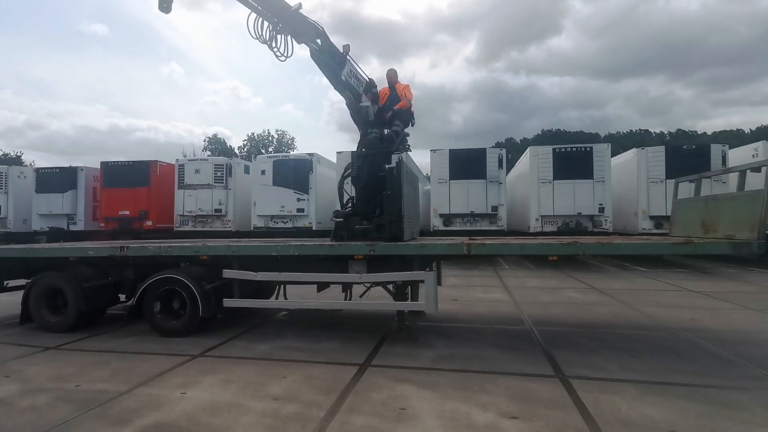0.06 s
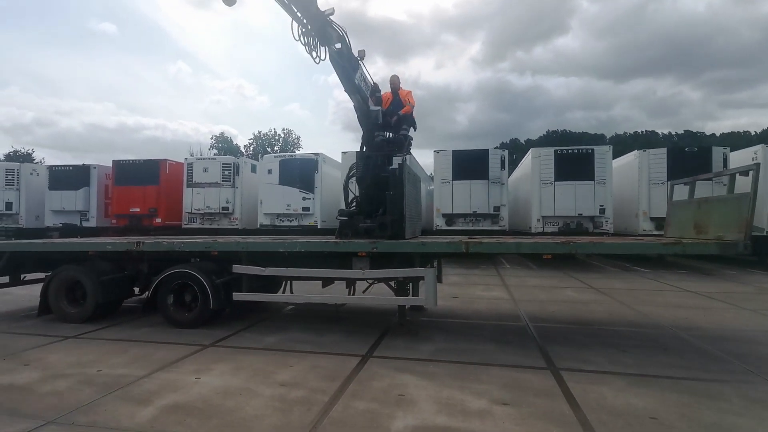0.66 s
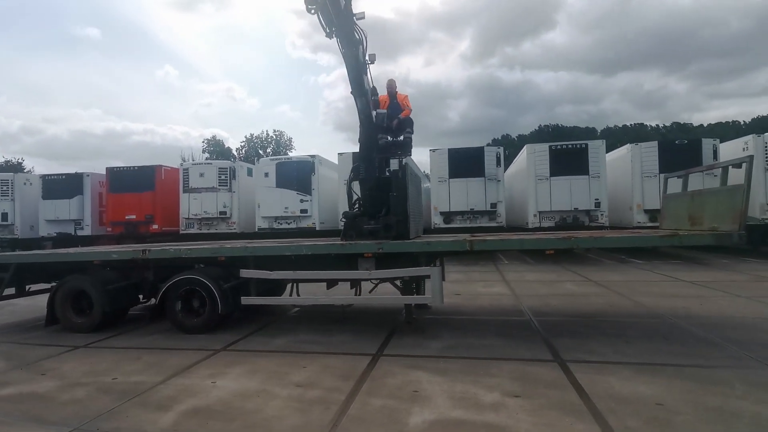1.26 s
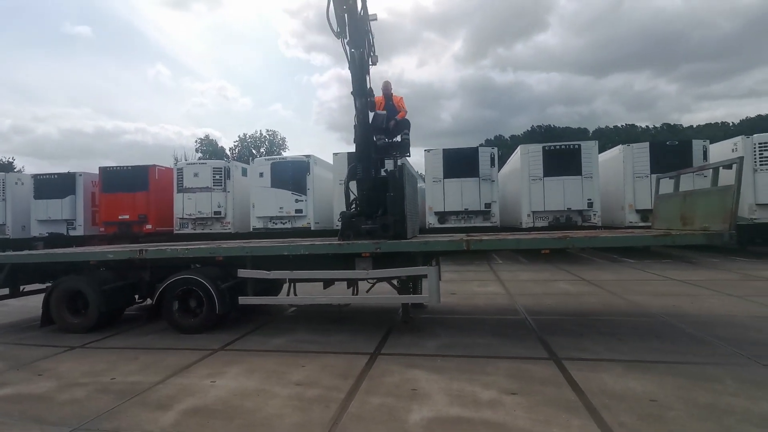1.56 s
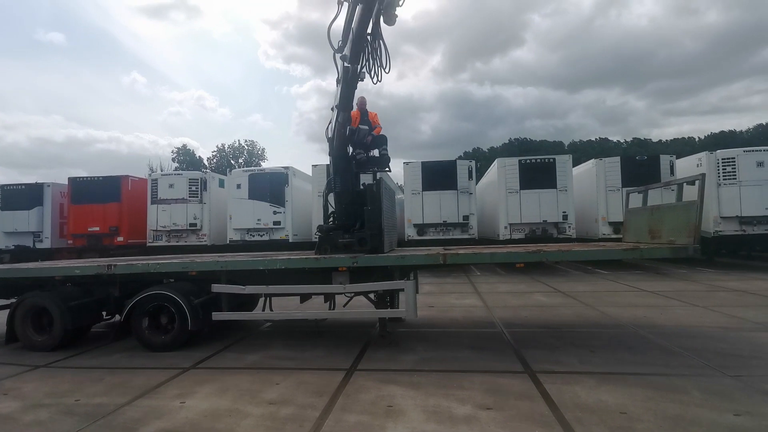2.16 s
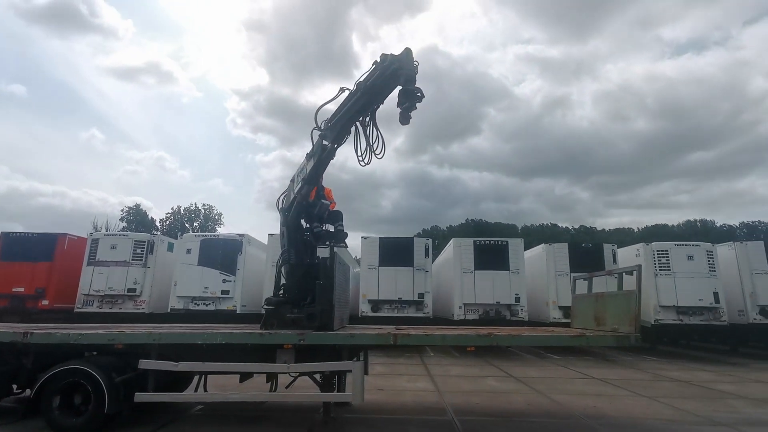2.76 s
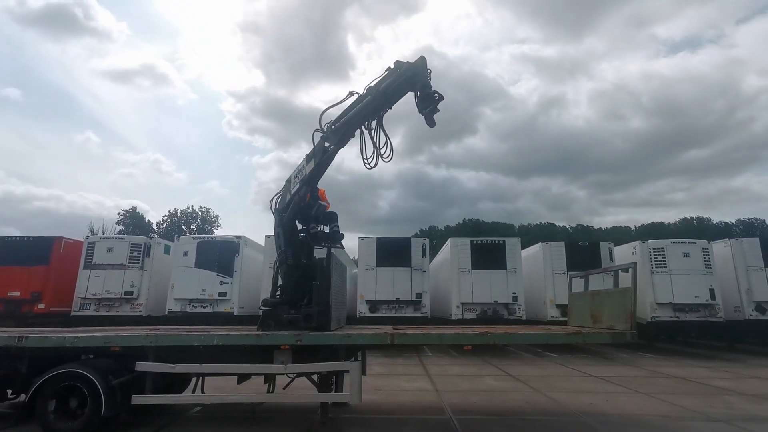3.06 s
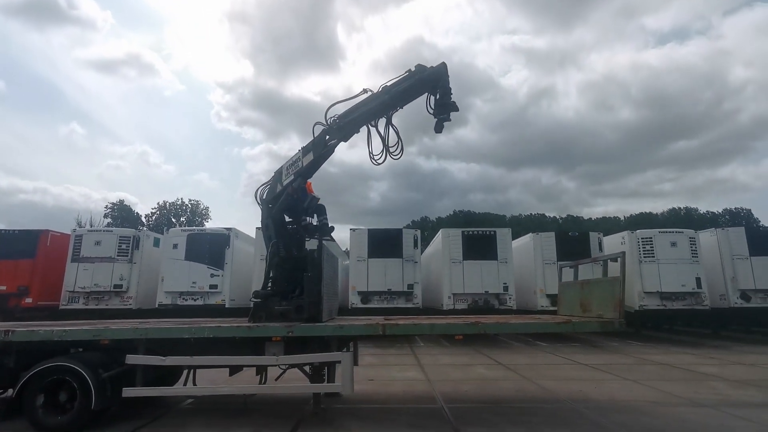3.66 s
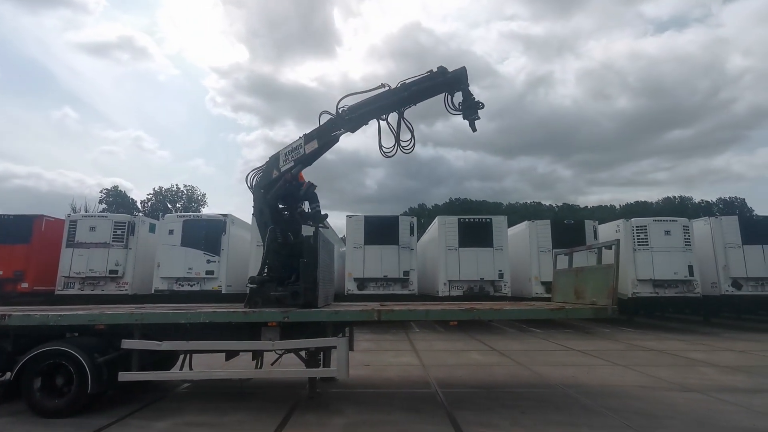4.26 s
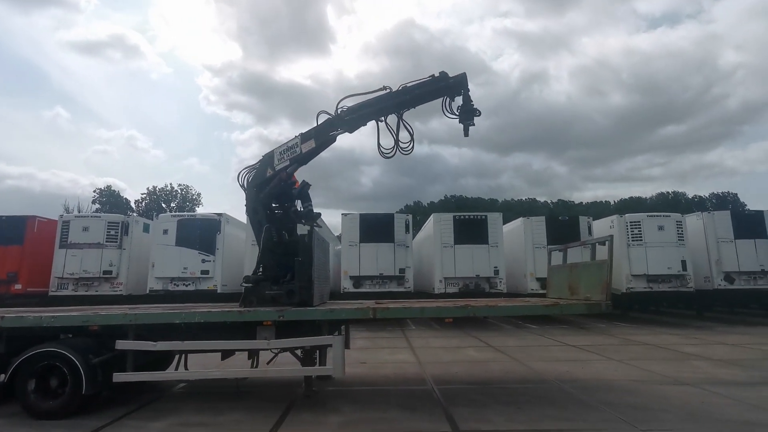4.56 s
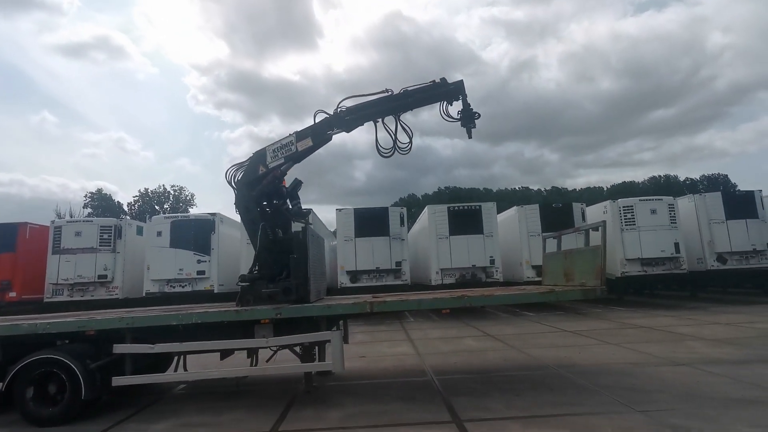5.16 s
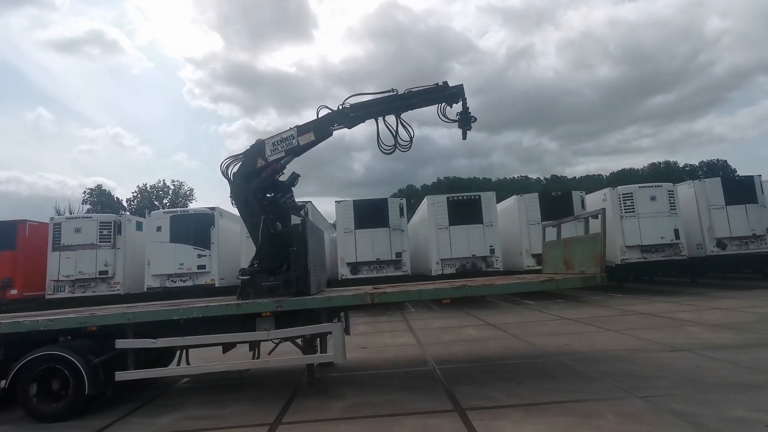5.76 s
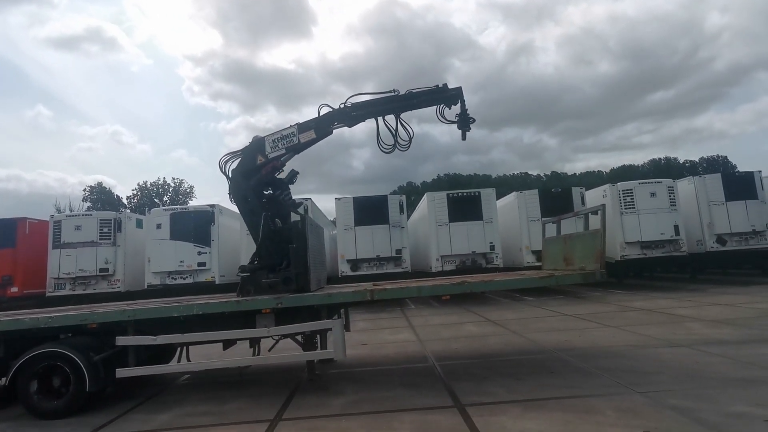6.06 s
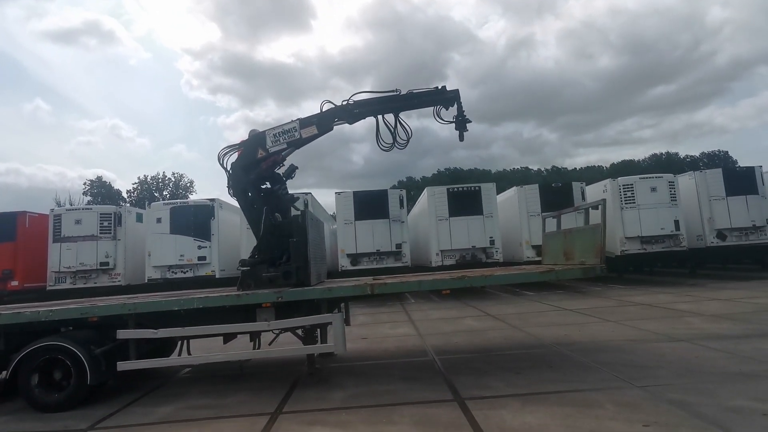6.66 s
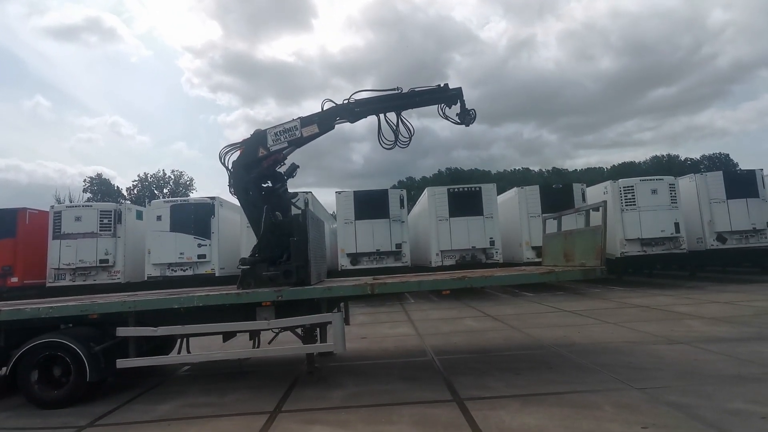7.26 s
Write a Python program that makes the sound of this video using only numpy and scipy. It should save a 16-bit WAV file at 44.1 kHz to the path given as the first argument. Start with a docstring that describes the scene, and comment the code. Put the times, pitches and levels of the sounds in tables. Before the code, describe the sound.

A small diesel engine runs in an open yard, a few metres away, with a steady knocking clatter and a low exhaust throb. From the start a hydraulic crane pump holds a fairly low, even whine whose overtones swell and fade, while oil hisses brightly through valves and hoses, with faint sizzles in the first second. Wind rumbles on the microphone, mostly on the left, lightly at first. From about 3.3 to 6 seconds it gusts harder, with sharp low thumps that briefly duck the whole machine. At about 6 seconds the load comes off: the whine dies away, the hiss drops, a soft rush of oil remains and the engine speeds up slightly with a fuller throb. More gusts hit between 6.6 and 7.1 seconds. A brief, hollow scuff sounds toward the right at about 7.3 seconds, with the engine still running.

```python
"""An open trailer yard, a few metres from a loader crane folding its boom.
A small diesel knocks steadily and drives a whining gear pump; oil hisses through valves and hoses.
Near 6 s the load comes off: the engine speeds up and the whine dies away. A short scuff comes last.
Gusts buffet the two ports of the microphone, whose gain control ducks the whole machine after each."""
import sys
import numpy as np
from scipy import signal
from scipy.fft import rfft, irfft
from scipy.io import wavfile

SR = 44100
rng = np.random.default_rng(int(sys.argv[2]) if len(sys.argv) > 2 else 0)


def master(y):
    """Save y as 16-bit WAV."""
    cut = np.clip(np.atleast_2d(y).T, -1, 1)
    pcm = np.round(cut * 32767)  # scale
    wavfile.write(sys.argv[1], SR, pcm.astype(np.int16))


N = 322371
TIME = np.arange(N) / SR
BINS = np.fft.rfftfreq(N, 1 / SR)

# The governor holds the speed, then overshoots. Each row: time in seconds, engine cycles a second.
ENGINE_SPEED = [(0.0, 13.78), (0.6, 13.787), (1.5, 13.851), (3.2, 13.844), (3.6, 13.829), (5.85, 13.825),
                (6.4, 15.48), (6.8, 15.135), (7.31, 15.44)]
# How hard the hydraulics work. Each row: time in seconds, load from 0 to 1.
OIL_LOAD = [(0, 1), (5.87, 0.96), (5.98, 0.47), (7.31, 0.6)]
# The rhythm of one engine cycle. Each row: position as a share of the cycle, accent in dB.
KNOCK_PATTERN = [(.74, -3.5), (.82, -4.5), (.9, -5), (.0, -6), (.16, -10), (.33, -12), (.52, -14)]
# The fader on the knock. Each row: time in seconds, level in dB.
KNOCK_LEVEL = [(0, -45), (1.35, -41.5), (1.75, -44), (2.3, -42), (4.1, -44), (4.6, -44), (5.05, -41.5),
               (5.6, -44.5), (6.05, -43), (6.48, -46), (6.65, -46.5), (7.31, -46)]
# The heavy block rings on, thin covers stop sooner. Each row: frequency in Hz, share that rings on.
LONG_RING_SHARE = [(200, .85), (700, .8), (1150, .55), (1550, .42), (3000, .3)]
# The knock's stereo image. Each row: frequency in Hz, left-right likeness from 0 to 1.
KNOCK_LIKENESS = [(60, 0.23), (300, 0.99), (700, 1), (1500, 0.92), (2100, 0.017), (15000, 0.064)]
# The body of the engine block. Each row: frequency in Hz, then relative gain under load,
# relative gain running free and left minus right, all in dB.
BLOCK_EQ = [(28, -89, -89, 4), (45, -76, -59, 8), (84.4, -62, -66, 5), (194, -57, -62, -5),
            (303, -64, -71, -4), (375, -65.5, -80, -2), (477, -71.5, -68, -2.5), (584, -75, -74, -6),
            (845, -67.5, -70.5, -1.5), (930, -79.5, -81, 1), (1120, -71, -66.5, -5.5),
            (1580, -68, -77, -3.5), (1970, -74.5, -67.5, -10), (2570, -78, -78.5, 0.5),
            (2920, -85, -85, 2.5), (6430, -91.5, -81, -13), (7860, -106, -104, 2), (10200, -105, -100, -5),
            (11200, -86, -89, -16), (14830, -104, -94, -10)]
# Ringing covers. Each row: centre and width in Hz, lift under load and running free in dB.
COVER_RINGS = [(381, 10, 6.5, 5), (478, 17, 7, 6), (750, 24, 3.5, 7), (1134, 34, 5, 11), (1270, 44, 2, -2),
               (1456, 27, 4.5, 6), (1523.6, 41, 11, -2), (1632, 42, 9.5, -4), (2030, 35, 0.5, 2),
               (2138, 28, 3, 11), (2454, 36, 8.5, 3), (2723, 63, 6.5, 1), (2970, 18, 1, 1)]
# Two mid bands of the engine's knock swell and fade as the microphone moves.
# Each row: time in seconds, lower and upper band gain in dB.
KNOCK_MID_SWELL = [(0, -3, -0.5), (.22, 3, -1), (.5, -6.5, -4), (.8, -1, -2), (1.1, -4.5, -6),
                   (1.35, -4, -4), (1.7, -1.5, -5.5), (2.2, -2.5, -1.5), (2.6, -2, -1.5), (3.05, 0, -1),
                   (3.38, -2, -3.5), (3.68, 0, -1.5), (4.05, -1, -4), (4.3, 0, 0), (4.65, -1, .5),
                   (4.85, -1, -5), (5.35, -10, -4), (5.85, -5, -4.5), (6.1, -0.5, 0), (6.45, -1, -6),
                   (6.8, -9, -5), (7.31, -4, -6)]
# Exhaust throb. Each row: multiple of the cycle rate, right level under load and running free in dB.
EXHAUST_ORDERS = [(2, -44, -53), (3, -35, -25), (4, -44.5, -26.5), (5, -39.5, -42), (7, -46.5, -41),
                  (8, -44.5, -46)]

# Pump whine, one envelope for each of harmonics 1-4. Each row: time in seconds, level in dB.
WHINE_LEVELS = [
    [(0, -23.5), (.78, -36), (1.1, -30.5), (1.4, -26.5), (2.3, -24.5), (3.2, -25.5), (5.55, -27.5),
     (5.97, -30), (6.05, -30.5), (6.13, -41), (6.45, -50.5), (7.31, -65)],
    [(0, -60), (.55, -59), (1.05, -47.5), (1.45, -48.5), (2.2, -54.5), (3.2, -51), (3.6, -40), (4.1, -39.5),
     (4.7, -44), (5.1, -36.5), (5.96, -38), (6.08, -52), (6.25, -100)],
    [(0, -45.5), (.75, -38.5), (1.35, -39.5), (2.5, -50), (3.95, -45.5), (4.45, -60), (5, -43),
     (5.7, -46.5), (5.89, -43), (6.0, -53), (6.15, -100)],
    [(0, -55), (.45, -52.5), (.68, -48.5), (1.3, -57), (2.4, -55), (3, -48), (4, -50), (5.9, -67),
     (6.15, -100)],
]
# The whine shifts as the microphone turns.
# Each row: time in seconds, the fundamental's left minus right in dB, its left lead in radians.
WHINE_PAN = [(0, -2.5, 0.23), (1.2, 3, 0.18), (1.7, 3, 0.17), (3.5, 2, 0.28), (7.31, 6.5, 0.18)]
# Oil flow through the valves. Each row: time in seconds, hiss level in dB.
HISS_LEVEL = [(0, -43), (.35, -41.5), (.53, -43), (.85, -42), (1.8, -43.5), (3.1, -42.5), (4.1, -43),
              (4.6, -42.5), (5.6, -44), (5.84, -43.5), (5.97, -44), (6.12, -51), (7.31, -52.5)]
# The colour of that hiss. Each row: frequency in Hz, left and right relative gain in dB.
HISS_EQ = [(1960, 4, 7.5), (3100, -6, -6), (4240, -4.5, -7.5), (5410, -0.5, 3.5), (5500, 2.5, -4),
           (6860, 2, -1), (7280, -2.5, -34), (8480, -18, -9.5), (10260, -12.5, -7.5), (10530, -28, 0),
           (11800, -14, -4), (13600, -15, -3.5), (14200, -21, -15), (16100, -14, -4)]
# The air on top of the hiss. Each row: time in seconds, lift above 9 kHz in dB.
HISS_AIR = [(0, 3), (.8, 2), (1.6, 2.5), (3.2, 0), (5, -2.5), (6, -3), (7.31, -2.5)]
# The valve jet's soft whistle: centre in Hz, width in Hz, lift in dB.
JET_WHISTLE = (8600, 110, 2.4)
# The jet's sizzles. Each row: peak time and half length in seconds, centre and width in Hz,
# right level in dB, left minus right in dB.
JET_SIZZLES = [(0.156, 0.17, 11300, 250, -49, -12), (0.835, 0.079, 2000, 302, -46, -22),
               (.85, 0.13, 10560, 220, -44.5, -18), (.9, 0.5, 5210, 110, -50, -4),
               (.8, 0.99, 3960, 750, -51.5, 0.5), (3.7, .7, 13450, 70, -56, -6),
               (4.541, 0.12, 5900, 700, -51, 2), (5.05, .08, 6100, 700, -48, 1),
               (5.807, .05, 6000, 800, -49, 0), (.3, .1, 6200, 900, -51, -1),
               (1.0, 0.17, 6000, 900, -52, -1)]
# The hoses rush most as the boom speeds up and as oil returns to the tank.
# Each row: time in seconds, level in dB.
HOSE_LEVEL = [(0, -48), (.5, -51), (.82, -46), (1.15, -54), (2.3, -55), (3.3, -54), (5.85, -56),
              (6.05, -48), (6.45, -49), (6.7, -49.5), (7.31, -52)]
# The colour of that rush. Each row: frequency in Hz, left and right relative gain in dB.
HOSE_EQ = [(200, -14, -12), (480, 1, 1), (800, 1, 2), (1200, -4, -0.5), (1700, -5, -1), (2150, -4, -2),
           (2700, -9, -9), (3500, -13, -17), (8000, -45, -45)]

# The bed of breeze at the left port. Each row: time in seconds, level before trim in dB.
BREEZE_LEVEL = [(0, -26.5), (1.1, -36), (1.7, -22), (2.45, -24.5), (3.15, -19), (3.37, -17.5), (3.6, -19),
                (5.7, -16), (6.2, -35), (6.75, -17.5), (7.31, -22)]
# Gusts. Each row: peak time and half length in seconds, left and right level before trim in dB.
WIND_GUSTS = [(0.077, 0.028, -24.5, -44), (0.517, 0.015, -23, -47), (1.736, 0.035, -21, -35),
              (3.25, 0.025, -22, -44), (3.998, .003, -28, -18), (4.07, .02, -15, -21),
              (4.146, 0.0087, -17, -25), (3.497, 0.044, -19, -28.5), (3.718, 0.033, -16.5, -22),
              (4.044, 0.15, -14, -25), (4.377, 0.054, -16.5, -30), (4.76, 0.074, -14, -27.5),
              (5.267, 0.095, -11, -29), (5.48, 0.082, -21, -33), (5.9, 0.068, -14, -32.5),
              (6.619, 0.035, -12, -44), (6.82, .018, -18, -36), (6.923, 0.013, -15, -39),
              (7.08, 0.05, -10.5, -28)]
# The wind's rumble. Each row: frequency in Hz, left and right relative gain in dB.
WIND_EQ = [(10.1, -9, -20), (30.4, 1, -18), (76.4, 4.5, -11), (168, -2.5, 1), (303, -11.5, -3.5),
           (441, -19.5, -4.5), (650, -34.5, -14), (950, -49, -21.5), (2570, -85, -52), (9000, -120, -100)]
# Eddies thump the left port. Each row: time in seconds, swing in dB, length in seconds,
# steep front in dB, churn before trim in dB.
EDDY_HITS = [(1.961, -9, 0.002, -18, -34), (3.33, -9, 0.0015, 3.5, -19.5), (3.505, -9, 0.0012, -24, -30),
             (3.571, -3, 0.0017, -9, -28), (3.715, -6.5, .0012, -20, -38), (3.786, -8, .0019, -24, -37),
             (3.891, -18, .003, 1, -32), (3.893, 4, .0014, -13, -34), (3.908, -6, 0.002, -20, -17),
             (4.066, 0.5, .0022, -4, -22), (4.15, -2, 0.0017, -22, -36), (4.799, -4, .0016, -12, -28),
             (5.168, -7, 0.0027, -21, -31), (5.235, -10, 0.00081, -27, -25), (5.261, -6, 0.002, -17, -22),
             (5.31, -14, 0.0012, 0, -28), (5.338, -4.5, 0.00082, -20, -30), (5.347, -8, 0.0021, -14, -25),
             (5.439, -3, 0.0012, -7, -20), (5.553, -16, 0.0011, -4.5, -23), (5.557, -4, .001, -20, -20),
             (5.561, 2.5, 0.0021, -4, -22), (5.572, -7, 0.00089, -18, -25), (5.684, -1, 0.0024, -19, -28),
             (5.871, 2, 0.0023, -14, -28), (6.596, -14, 0.0032, -5, -38), (6.622, -5, 0.0012, -22, -35),
             (7.105, -14, 0.0015, -6, -34)]
# One scuff: peak time in seconds, scrape level before panning in dB, decay in seconds, ring in Hz.
SCUFF_HIT = (7.269, -42.5, .018, 690)


def diesel(cycles, load):
    """The knock sounds through the block and its covers, changing colour as the load comes off."""
    knock = yard_echoes(at_ports(*knocks(cycles)), echo_db=-16, spread_s=.01)
    pan_db = np.array([over_pitch(BLOCK_EQ, 3), np.zeros_like(BINS)])
    loaded_db = over_pitch(BLOCK_EQ, 1) + sum(resonance(hz, width, db) for hz, width, db, _ in COVER_RINGS)
    free_db = over_pitch(BLOCK_EQ, 2) + sum(resonance(hz, width, db) for hz, width, _, db in COVER_RINGS)
    body = load * eq(knock, loaded_db + pan_db) + (1 - load) * eq(knock, free_db + pan_db)
    mid_rms = band(body.mean(0), 1100, 3000).std()
    for column, edges_hz in enumerate([(1000, 1380), (1380, 1800)], 1):
        body = body + band(body, *edges_hz) * (from_db(envelope(KNOCK_MID_SWELL, column)) - 1)
    return body / mid_rms * from_db(envelope(KNOCK_LEVEL))


def knocks(cycles, ring_s=.016, tail_s=.08, tail_db=-18, long_s=.09, loose=.18, jitter_s=.000015):
    """Each blow rings the block: the same short and long ring every cycle, plus loose rattle."""
    t = np.arange(SR // 4) / SR
    attack = 1 - np.exp(-t / .0007)
    short_decay = attack * (np.exp(-t / ring_s) + from_db(tail_db) * np.exp(-t / tail_s))
    short_ring, long_ring = np.zeros((2, 2, N))
    rattle_power = np.zeros(N)
    for position, db in KNOCK_PATTERN:
        beats = np.flatnonzero(np.diff(np.floor(cycles - position)))
        late, uneven = rng.standard_normal((200, 2))[:len(beats)].T
        beats = np.clip(beats + np.round(late * jitter_s * SR).astype(int), 0, N - 1)
        blows = np.zeros(N)
        blows[beats] = from_db(db + 1.3 * uneven)
        for ring, decay in [(short_ring, short_decay), (long_ring, np.exp(-t / long_s))]:
            modes = rfft(np.sqrt(decay) * rng.standard_normal((2, len(t))))
            clang = np.sqrt(decay) * irfft(modes / abs(modes), len(t))  # dense modes of even strength
            ring += signal.oaconvolve(blows[None], clang, axes=1)[:, :N]
        rattle_power += signal.oaconvolve(blows ** 2, short_decay ** 2)[:N]
    rattle = np.sqrt(abs(rattle_power)) * rng.standard_normal((2, N))
    clatter = np.sqrt(1 - loose) * unit(short_ring) + np.sqrt(loose) * unit(rattle)
    share = over_pitch(LONG_RING_SHARE)
    return irfft(np.sqrt(1 - share) * rfft(clatter) + np.sqrt(share) * rfft(unit(long_ring)), N)


def exhaust(cycles, load, left_db=2, waver_db=3):
    """Low engine orders make a wavering throb, nearly alike at both ports."""
    throb = np.zeros(N)
    for order, loaded_db, free_db in EXHAUST_ORDERS:
        level_db = load * loaded_db + (1 - load) * free_db + waver_db * drift(10.5)
        throb += from_db(level_db) * np.sin(2 * np.pi * (order * cycles + rng.random()))
    return np.sqrt(2) * throb * from_db([[left_db], [0]])


def pump(cycles, load, pulses_per_cycle, sway_rad=.16, wander_rad=.1, flutter_db=.5, fifth_db=-57):
    """Gear teeth pulse the oil into a whine; the shaft sways in each engine cycle, adding sidebands."""
    sway = sway_rad * np.sin(2 * np.pi * cycles)
    phase = 2 * np.pi * pulses_per_cycle * cycles + sway + wander_rad * drift(45)
    levels = [from_db(envelope(rows)) for rows in WHINE_LEVELS] + [load * from_db(fifth_db)]
    left_lead = envelope(WHINE_PAN, 2)
    pans_db = [envelope(WHINE_PAN), -2.5, 0, -6.5, 0]  # left minus right, for each harmonic
    whine = np.zeros((2, N))
    for k, (level, pan_db) in enumerate(zip(levels, pans_db), 1):
        flutter = from_db(flutter_db * np.sqrt(k) * drift(26))  # overtones are less steady
        tone = np.array([from_db(pan_db) * np.sin(k * (phase + left_lead)), np.sin(k * phase)])
        whine += np.sqrt(2) * level * flutter * tone
    return whine


def valves(cycles, pulses_per_cycle, ripple_depth=.036, flicker_db=.65, low_cut_hz=2550):
    """Oil squeezed through the valves hisses and ripples with the pump; the narrow jet has little bass."""
    jet_db = resonance(*JET_WHISTLE) - 10 * np.log10(1 + (low_cut_hz / (BINS + 1)) ** 4)
    hiss = np.array([eq(rng.standard_normal(N), over_pitch(HISS_EQ, side) + jet_db) for side in (1, 2)])
    air = irfft(rfft(hiss) * np.clip((BINS - 7000) / 2000, 0, 1), N)
    hiss += air * (from_db(envelope(HISS_AIR)) - 1)
    hiss = yard_echoes(hiss, echo_db=-8.5, spread_s=.014)
    ripple = 1 + ripple_depth * np.cos(2 * np.pi * pulses_per_cycle * cycles)
    return hiss / hiss.mean(0).std() * ripple * from_db(envelope(HISS_LEVEL) + flicker_db * drift(29))


def jet_sizzles():
    """Now and then the valve jet sings out in one band."""
    noise, out = rfft(rng.standard_normal((2, N))), np.zeros((2, N))
    for peak_s, half_s, hz, width, db, pan_db in JET_SIZZLES:
        sizzle = unit(irfft(noise / (1 + ((BINS - hz) / width) ** 2), N))
        out += sizzle * swell(peak_s, half_s) * from_db([[db + pan_db], [db]])
    return out


def hoses(flicker_db=.5):
    """Turbulent oil in the hoses: an even rush that fills the gaps between the engine's beats."""
    rush = np.array([eq(rng.standard_normal(N), over_pitch(HOSE_EQ, side)) for side in (1, 2)])
    return unit(rush) * from_db(envelope(HOSE_LEVEL) + flicker_db * drift(12))


def wind(left_trim_db=-1, lee_db=-36.5, lee_swing=.93, lumps_db=2, brighten=.33, bass_hz=250):
    """Lumpy turbulence at each port, brighter as it blows harder; the right port is sheltered."""
    left_db = envelope(BREEZE_LEVEL)
    right_db = lee_db + lee_swing * (left_db - left_db.mean())
    out = []
    for side, (breeze_db, trim_db) in enumerate([(left_db, left_trim_db), (right_db, 0)]):
        rumble = unit(eq(rng.standard_normal(N), over_pitch(WIND_EQ, side + 1)))
        bass = irfft(rfft(rumble) / (1 + (BINS / bass_hz) ** 4), N)
        gust_power = sum((from_db(port_db[side]) * swell(peak_s, half_s)) ** 2
                         for peak_s, half_s, *port_db in WIND_GUSTS)
        force_db = 10 * np.log10(from_db(breeze_db) ** 2 + gust_power) + lumps_db * drift(33)
        upper = (rumble - bass) * from_db(brighten * (force_db - np.percentile(force_db, 75)))
        out.append((bass + upper) * from_db(force_db + trim_db))
    return np.array(out)


def eddies(right_db=-24, front_share=.4, churn_trim_db=-.5, churn_hz=680, churn_s=.0062):
    """Each eddy is one swing of pressure, with a steep drop and a short flutter of churning air."""
    out = np.zeros(N)
    froth_db = -10 * np.log10((1 + (BINS / churn_hz) ** 8) * (1 + (200 / (BINS + 1)) ** 2))
    froth = unit(eq(rng.standard_normal(N), froth_db))
    for at_s, swing_db, length_s, front_db, churn_db in EDDY_HITS:
        near = abs(TIME - at_s) < .04
        t = TIME[near] - at_s
        bell = np.exp(-(t / length_s) ** 2 / 2)
        swing = from_db(swing_db) * (1 - (t / length_s) ** 2) * bell
        front = -from_db(front_db) * np.tanh(t / (front_share * length_s)) * bell
        churn = from_db(churn_db + churn_trim_db) * froth[near] * np.exp(-(t / churn_s) ** 2 / 2)
        out[near] += swing + front + churn
    return out * from_db([[0], [right_db]])


def scuff(ring_db=9, rise_s=.0019, top_hz=11500):
    """A brief bright scrape with a hollow ring, nearer the right port."""
    at_s, db, decay_s, ring_hz = SCUFF_HIT
    scrape = unit(eq(rng.standard_normal((2, N)), -10 * np.log10(1 + (BINS / top_hz) ** 12)))
    ring = from_db(ring_db) * np.sin(2 * np.pi * ring_hz * TIME)
    burst = np.exp(-abs(TIME - at_s) / np.where(TIME < at_s, rise_s, decay_s))
    return (scrape + ring) * burst * from_db([[db - 3], [db + 3]])


def at_ports(direct, scattered, lead_s=.00023):
    """The left port hears the direct sound a little early, blended with scatter from the yard."""
    likeness = over_pitch(KNOCK_LIKENESS)
    early = rfft(direct) * np.exp(2j * np.pi * BINS * lead_s)
    left = likeness * early + np.sqrt(1 - likeness ** 2) * rfft(scattered)
    return np.array([irfft(left, N), direct])


def yard_echoes(stereo, echo_db, spread_s, count=12):
    """Early echoes off the concrete and the trailer bed, different at each port."""
    out = []
    for port in stereo:
        delays_s = .001 + spread_s * rng.random(count)
        gains = rng.standard_normal(count)
        taps = np.zeros(SR // 4)
        taps[(delays_s * SR).astype(int)] = gains / np.linalg.norm(gains) * from_db(echo_db)
        taps[0] = 1
        out.append(signal.oaconvolve(port, taps / np.linalg.norm(taps))[:N])
    return np.array(out)


def from_db(db):
    """Decibels to gain."""
    return 10 ** (np.asarray(db) / 20)


def unit(x):
    """Scales to rms 1."""
    return x / np.sqrt(np.mean(x ** 2) + 1e-20)


def envelope(rows, column=1):
    """One column of a table, drawn along time."""
    rows = np.array(rows)
    return np.interp(TIME, rows[:, 0], rows[:, column])


def over_pitch(rows, column=1):
    """One column of a table, drawn along log frequency."""
    rows = np.array(rows)
    return np.interp(np.log(BINS + 1), np.log(rows[:, 0]), rows[:, column])


def eq(x, db):
    """Filters x by a gain in dB for each frequency."""
    return irfft(rfft(x) * from_db(db), N)


def resonance(hz, width, db):
    """A bell-shaped lift in dB."""
    return db / (1 + ((BINS - hz) / width) ** 2)


def band(x, low_hz, high_hz):
    """A band-pass with soft edges."""
    return irfft(rfft(x) / (1 + ((2 * BINS - low_hz - high_hz) / (high_hz - low_hz)) ** 10), N)


def drift(hz):
    """A random wobble of rms 1, up to about hz."""
    return unit(irfft(rfft(rng.standard_normal(N)) * np.exp(-(BINS / hz) ** 2), N))


def swell(peak_s, half_s):
    """A smooth rise and fall of height 1."""
    return np.exp(-((TIME - peak_s) / half_s) ** 2 / 2)


def lag(x, seconds):
    """Follows x sluggishly, with this time constant."""
    keep = np.exp(-1 / (seconds * SR))
    return signal.lfilter([1 - keep], [1, -keep], x)


def scene(start_cycle=.66, pulses_per_cycle=18):
    """The crane, its engine and pump locked to one shaft, with wind on the microphone and a scuff."""
    cycles = start_cycle + np.cumsum(envelope(ENGINE_SPEED)) / SR
    load = envelope(OIL_LOAD)
    engine = diesel(cycles, load) + exhaust(cycles, load)
    hydraulics = pump(cycles, load, pulses_per_cycle) + valves(cycles, pulses_per_cycle) + hoses()
    return engine + hydraulics + wind() + eddies() + scuff() + jet_sizzles()


def record(dry):
    """Gain control: the louder port ducks both and the gain creeps back; then clipping and a high cut."""
    threshold_db, squeeze, high_cut_hz = -21.5, .37, 15850
    sense_s, attack_s, recover_db_per_s = .024, .0011, 18
    level_db = 10 * np.log10(lag(dry ** 2, sense_s).max(0) + 1e-12)
    cut_db = squeeze * np.maximum(level_db - threshold_db, 0)
    recovery_db = recover_db_per_s * TIME
    held_db = np.maximum.accumulate(cut_db + recovery_db) - recovery_db
    ducked = dry * from_db(-lag(held_db, attack_s))
    return irfft(rfft(np.clip(ducked, -1, 1)) / (1 + (BINS / high_cut_hz) ** 400), N)


dry = scene()
out = record(dry)
master(out)
```